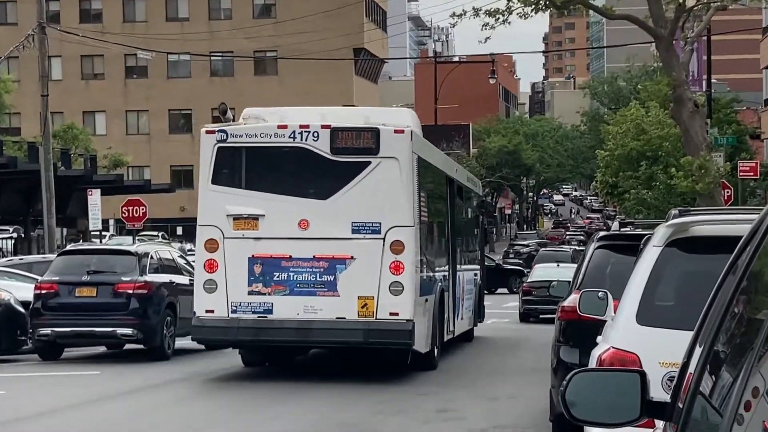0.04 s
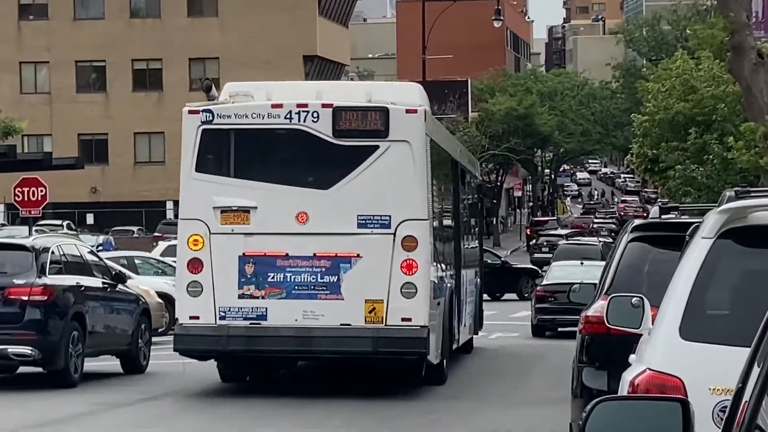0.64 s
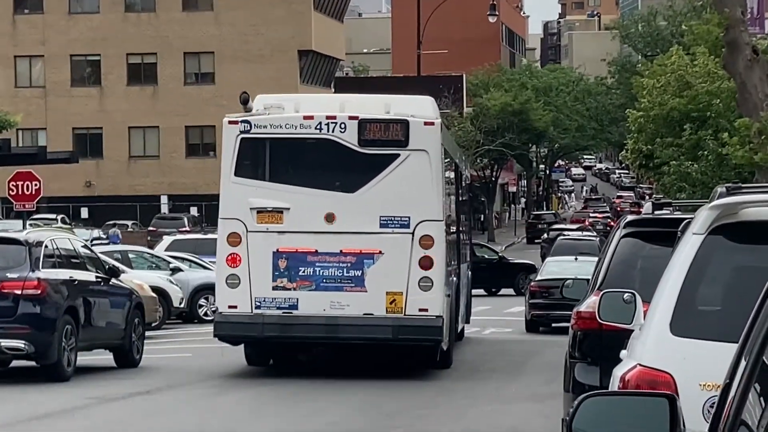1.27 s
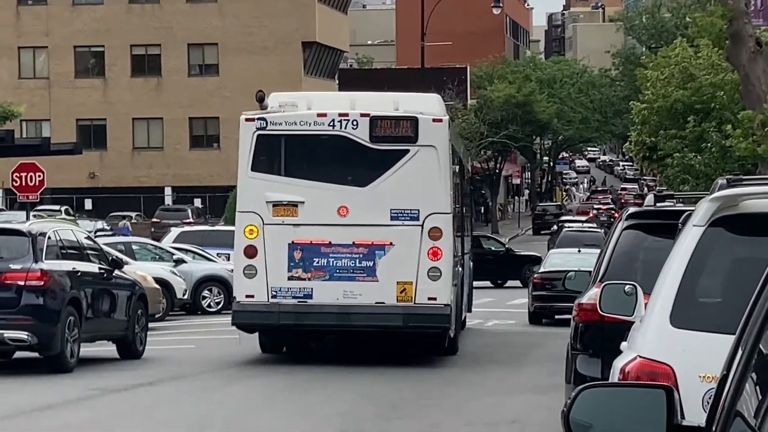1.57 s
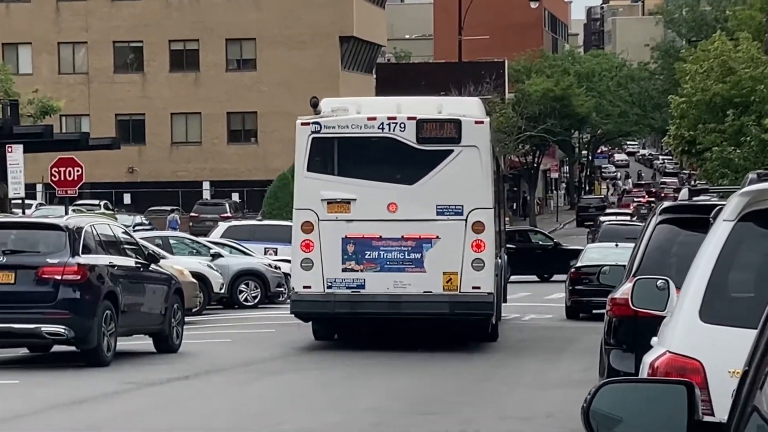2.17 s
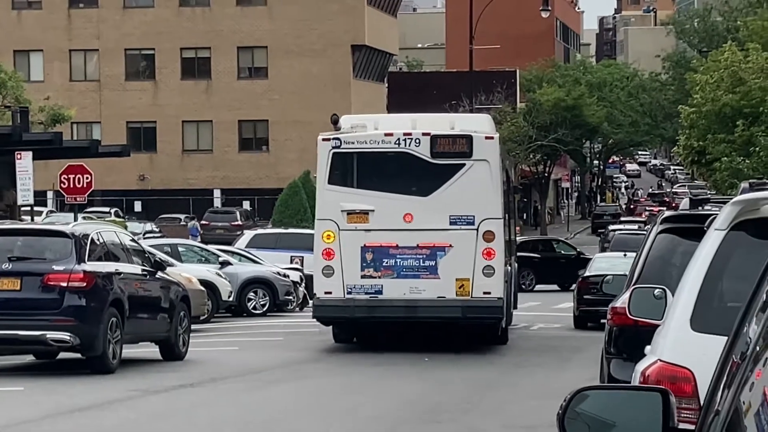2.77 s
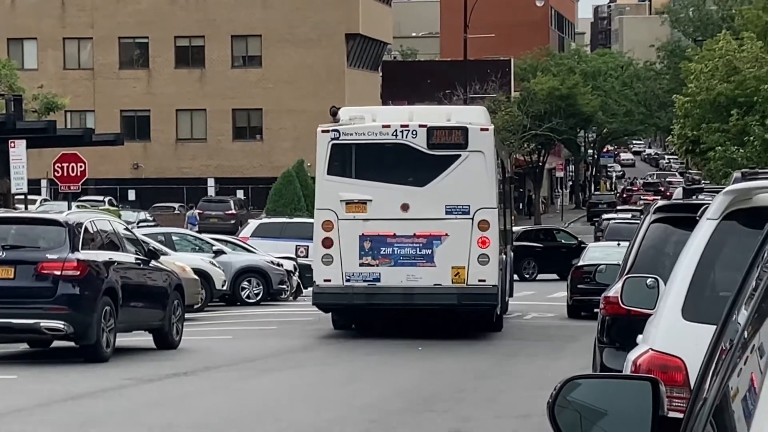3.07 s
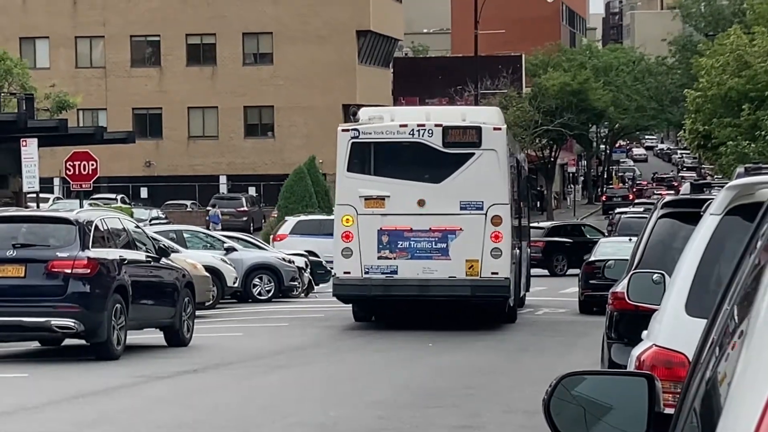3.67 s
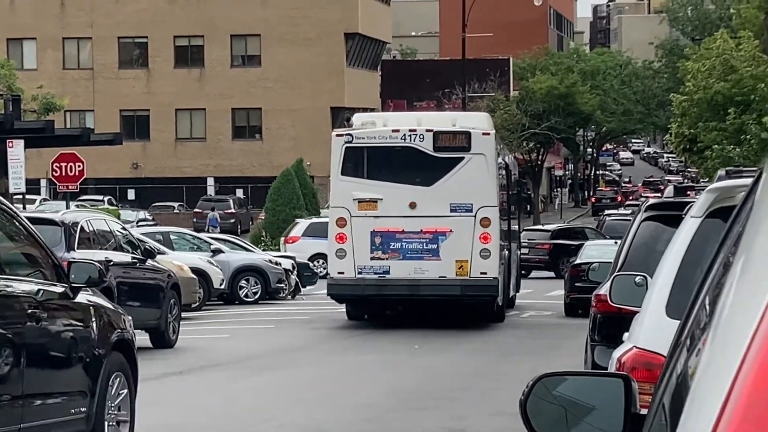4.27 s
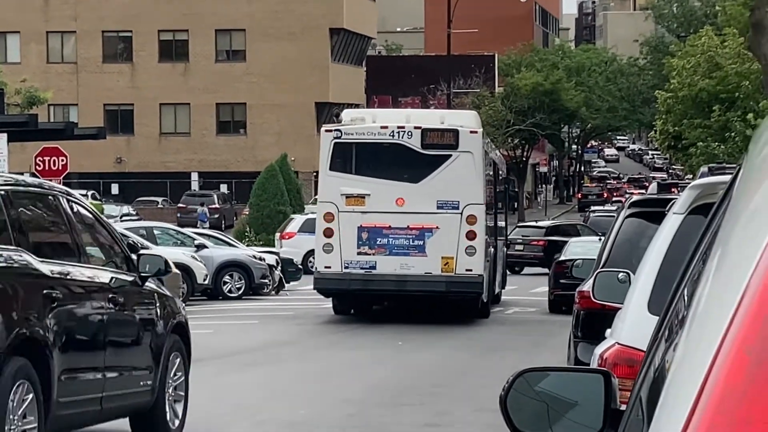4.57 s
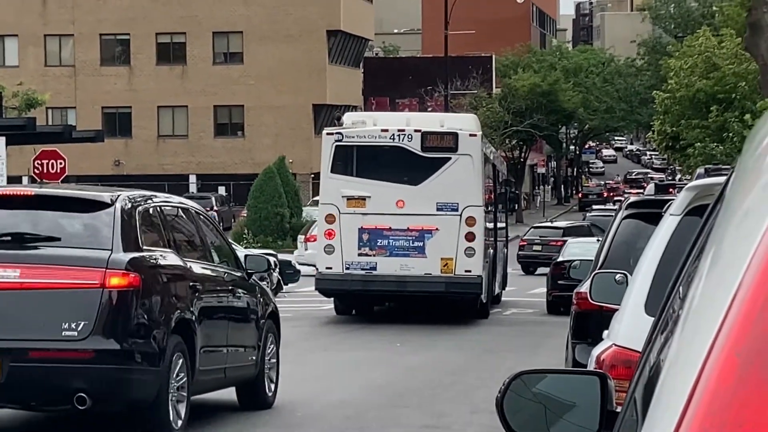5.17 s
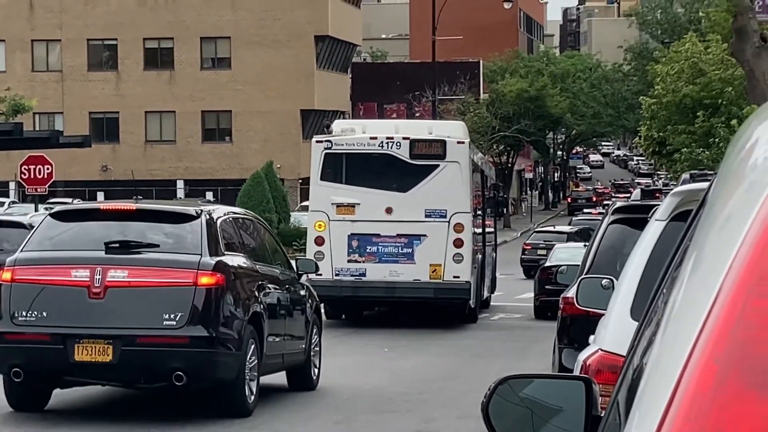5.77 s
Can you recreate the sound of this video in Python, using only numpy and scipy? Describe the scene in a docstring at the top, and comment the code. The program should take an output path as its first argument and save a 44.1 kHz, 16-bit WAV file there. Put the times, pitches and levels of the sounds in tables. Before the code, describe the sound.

On a busy street, a departing bus rumbles and slows, its brakes squeaking and air hissing out as a breeze picks up.

```python
"""A busy city street, kerb side of a traffic queue. A bus rolls away and eases off.
Its diesel drones at a steady firing rate; gear whines fall with the wheels; brake pads stick and slip,
singing and squeaking. Traffic booms and hisses, and the middle of the sound dips briefly after 4 s.
A breeze buffets the two microphone ports. A valve bleeds air, then puffs near the end."""
import sys
import numpy as np
from scipy import signal
from scipy.fft import rfft, irfft, next_fast_len
from scipy.io import wavfile
from scipy.ndimage import uniform_filter1d

SR = 44100
rng = np.random.default_rng(int(sys.argv[2]) if len(sys.argv) > 2 else 0)


def transcribe(signal):
    """Save signal, clipped to [-1, 1], as a 16-bit WAV file at the path in sys.argv[1]."""
    frames = np.atleast_2d(signal).T
    limited = np.clip(frames, -1, 1)
    pcm = np.round(limited * 32767).astype(np.int16)
    wavfile.write(sys.argv[1], SR, pcm)


N = 261507
TIME_S = np.arange(N) / SR
BINS_HZ = np.fft.rfftfreq(N, 1 / SR)
FIRING_HZ = 39.72
START_M_PER_S, START_DISTANCE_M = 6.5, 45

# Low engine-bay tones: exhaust partials plus a separate 137 Hz accessory hum.
# Each row: frequency as a ratio to the firing rate, relative dB at start, midway and end.
LOW_TONES = [(1, -8, -10, -6), (2, 0.5, 0, -1), (3, -20, -13, -12), (3.45, -6, -11, -13), (4, -6, -12, -26),
             (5, -14, -3, -28), (5.4, -16, -11, -24), (6, -12, -7.5, -18), (6.75, -13, -20, -22),
             (7, -19, -15, -18)]
# Drone of the low tones. Each row: time in seconds, base level in dB.
DRONE_DB = [(0, -35.5), (.8, -32.8), (1.7, -36), (2.4, -39), (2.9, -38), (3.6, -38.3), (4.4, -43),
            (5.3, -36)]
# Upper accessory hum. Each row: time in seconds, level in dB.
HUM_DB = [(0, -50), (1.2, -47), (2.05, -46), (3.15, -48), (3.7, -54), (4.5, -51), (5.1, -47.5),
          (5.93, -45.5)]
# Engine noise. Each row: time in seconds, growl in dB, clatter in dB.
GROWL_CLATTER_DB = [(0, -34, -40), (1, -36.5, -38.5), (1.8, -36, -40.5), (2.4, -37, -40), (3.3, -37.5, -43),
                    (3.8, -42.5, -43), (4.4, -39.5, -41.5), (5.3, -40, -41), (5.6, -38.5, -41),
                    (5.93, -39.5, -42.5)]
# Engine bay resonances. Each row: frequency in Hz, level in dB at the starting distance.
BAY_MODES = [(825, -46), (1370, -51)]
# Gear shaft, slowing with the wheels. Each row: time in seconds, turning rate in Hz.
SHAFT_HZ = [(0, 132.1), (2.2, 91.6), (3, 77.5), (4.2, 49)]
# Two gear meshes and sidebands of uneven teeth. Each row: multiple of the shaft rate, relative dB.
MESH_ORDERS = [(25, -12), (26, -10), (28, 0), (29, -9), (30, -6), (31, -3), (33, -9)]
# Whines under changing tooth load. Each row: time in seconds, base level in dB.
TOOTH_LOAD_DB = [(0, -69), (.3, -66), (.6, -68), (.9, -62), (1.05, -62), (1.2, -66), (1.49, -65),
                 (1.55, -55), (1.85, -60), (2, -56), (2.15, -59), (2.45, -55), (2.8, -56), (3.05, -58.5),
                 (3.35, -57), (3.7, -56), (3.95, -56), (4.3, -70), (5.93, -100)]
# Gear casing resonances. Each row: frequency in Hz, width in Hz, lift in dB.
CASING_MODES = [(4000, 250, 11), (3570, 160, 14.5), (2885, 90, 14), (2560, 60, 9), (2440, 50, 9),
                (2290, 90, 11), (2030, 200, 7), (1800, 130, 10.5)]
# Whine direction. Each row: frequency in Hz, share of the street's angle off the microphone axis.
WHINE_DIRECTION = [(1700, .8), (2000, 1), (2200, .66), (2600, .66), (2750, 1)]
# Tooth rasp, dragging brake pad, fan tone. Each row: time in seconds, level in dB.
TOOTH_RASP_DB = [(0, -70), (1.1, -62), (1.7, -54), (2.5, -52.5), (3.2, -52), (4, -58), (5.93, -90)]
PAD_DRAG_DB = [(0, -48.5), (.38, -59), (.62, -51), (.8, -57), (1.65, -50.5), (2.05, -49.5), (2.25, -57.5),
               (3.58, -56), (3.75, -62.5), (5.93, -72)]
FAN_DB = [(0, -41), (.4, -40.5), (.6, -44), (.82, -41.5), (1, -48), (1.15, -39), (1.65, -41), (2.1, -49),
          (2.35, -44), (3.15, -43.5), (3.55, -40), (4.05, -41), (4.2, -47), (4.35, -42.5), (4.5, -49),
          (4.7, -44.5), (5.25, -43.5), (5.5, -49), (5.75, -45), (5.93, -48)]
# Brake squeaks. Each row: start in seconds, length in seconds, pitch in Hz, glide in Hz, relative dB.
BRAKE_SQUEAKS = [(0.01, 0.15, 7060, -170, -64), (0.078, 0.1, 8170, 132, -55.5),
                 (0.19, 0.17, 7000, -190, -61), (0.21, 0.08, 8790, 40, -65), (0.429, 0.11, 8210, 103, -50),
                 (0.795, 0.1, 8280, 90, -57), (0.99, 0.07, 8670, 40, -69), (1.285, 0.078, 8340, 132, -63),
                 (1.613, 0.073, 8220, 87, -48.5), (1.861, 0.071, 8810, -17, -54),
                 (2.123, 0.18, 8330, 97, -54), (2.572, 0.1, 8330, -110, -52.5),
                 (3.224, 0.23, 8440, -91, -54.5), (3.779, 0.12, 8440, -22, -46.5),
                 (3.903, 0.13, 8410, -36.5, -46.5), (4.022, 0.07, 8420, 100, -57),
                 (4.107, 0.13, 8490, 47, -54.5), (5.125, .08, 10430, 10, -60),
                 (5.21, 0.15, 9150, 114, -59.5), (5.398, 0.08, 5450, -150, -61),
                 (5.475, 0.055, 9200, -40, -58)]
# Air bleed, then puff. Each row: fully open at seconds, hold in seconds, dB, rise and fall in dB/s.
VALVE_RELEASES = [(2.7, 0.84, -50.5, 47, 13), (5.52, 0.05, -46.5, 180, 80)]
# Wind gusts. Each row: peak time in seconds, level in dB.
GUST_PEAKS = [(2.518, -42), (2.88, -36), (3.278, -33), (4.72, -53)]
# Noise spectra. Each row: frequency in Hz, relative density in dB.
BOOM_SPECTRUM = [(15, -62), (30, 1.5), (42, 2), (66, 0), (90, -1), (115, -2.5), (150, -7), (200, -9),
                 (300, -8.5), (420, -7), (540, -19), (800, -14.5), (2000, -112)]  # engine bay and traffic
GROWL_SPECTRUM = [(200, -68), (500, -3), (700, 1.5), (850, 5), (950, 4), (1100, -3), (1500, -76),
                  (3000, -90)]
CLATTER_SPECTRUM = [(400, -59), (900, -31), (1200, 0), (1450, -2.5), (1800, -5.5), (2200, -12), (3000, -19),
                    (8000, -77)]
REAR_GROWL_SPECTRUM = [(200, -67), (480, -6.5), (680, -4), (820, 6), (930, 0.5), (1080, -11.5), (1500, -21),
                       (2000, -17), (2600, -60)]
TYRE_SPECTRUM = [(800, -47), (2200, 1), (3300, 2.5), (4000, 3.5), (5000, -1), (6500, -3.5), (7800, -7),
                 (10000, -7.5), (11500, -17.5), (14000, -17), (16000, -58)]
CAR_SPECTRUM = [(500, -36), (1500, -9), (2300, -12), (3000, 3), (3700, 8), (5000, -3.5), (7000, -12),
                (12000, -49)]
AIR_SPECTRUM = [(900, -20), (2000, 5), (3200, 6.5), (4500, 7), (6000, 3), (8000, 0), (10000, 4),
                (13000, -8), (16000, -10)]
WIND_SPECTRUM = [(20, -30), (32, -14), (48, 0), (90, -3), (160, -11), (350, -20), (900, -45), (3000, -100)]
# Microphone ports. Each row: frequency in Hz, left lead in radians, coherence, left minus right in dB.
PORT_RESPONSE = [(60, -.05, .93, 1.8), (250, -.25, .85, 3), (390, -.85, .7, 2.5), (550, -1.8, .42, 0),
                 (950, -2.4, .88, -1), (1300, -2.5, .6, -.5), (1900, -3.1, .55, 0), (4200, -3.3, .66, 0),
                 (5500, -3.1, .7, 0), (7100, -1.5, .7, 0), (8000, -.2, .9, 0), (8800, 0, .9, 0),
                 (11000, 2.5, .72, 0), (14500, 6.1, .6, 0)]


def diesel(hum_hz=398, muffler_hz=207):
    """Steady exhaust partials and a 137 Hz accessory hum, an upper hum, a muffler rung by gas flow."""
    drone_db = curves(DRONE_DB)[0]
    drone = np.zeros((2, N))
    for ratio, *tone_db in LOW_TONES:
        db = drone_db + np.interp(TIME_S, np.linspace(0, TIME_S[-1], len(tone_db)), tone_db)
        drone += tone(np.full(N, ratio * FIRING_HZ), db, scatter=.08 * ratio, flutter_hz=3.55)
    hum = tone(hum_hz * doppler(), curves(HUM_DB)[0], scatter=.84, flutter_hz=12)
    flow_db = swell(1.6, 3.12, db=-42, rise_db_per_s=7, fall_db_per_s=58)
    muffler = tone(np.full(N, muffler_hz), flow_db, scatter=3, flutter_hz=32.7)
    return drone + hum + muffler


def engine_noise(knock_depth=.036, boom_db=-32):
    """Boom, growl, clatter and bay resonances; combustion knock pulses the growl and clatter."""
    growl_db, clatter_db = curves(GROWL_CLATTER_DB)
    knock = 1 + knock_depth * np.cos(2 * np.pi * 2 * FIRING_HZ * TIME_S)
    # the boom grows while the drive holds the bus back
    labour_db = 3 * amp(swell(2.45, .34, db=-.5, rise_db_per_s=22, fall_db_per_s=22))
    boom = noise(BOOM_SPECTRUM) * amp(boom_db + labour_db + distance_db())
    growl = noise(GROWL_SPECTRUM) * amp(growl_db + 1.2 * drift(25))
    clatter = noise(CLATTER_SPECTRUM) * amp(clatter_db + .8 * drift(30))
    bay = sum(tone(np.full(N, hz), db + distance_db(), scatter=17, flutter_hz=43.2)
              for hz, db in BAY_MODES)
    return boom + mottle(knock * (growl + clatter) + bay, depth_db=2, patch_hz=90, patch_s=.07)


def gears(rasp_order=25):
    """Mesh whines and the rasp of rattling teeth fall with the shaft and fade; a whistle joins them."""
    shaft_hz = curves(SHAFT_HZ)[0] + .35 * drift(40)
    load_db = curves(TOOTH_LOAD_DB)[0]
    whines = np.zeros((2, N))
    for order, mesh_db in MESH_ORDERS:
        hz = order * shaft_hz
        db = load_db + mesh_db + casing_db(hz) + 2 * drift(14)
        whines += tone(hz, db, scatter=1.2, flutter_hz=55)
    rasp = tone(rasp_order * shaft_hz, curves(TOOTH_RASP_DB)[0], scatter=6, flutter_hz=560)
    echoed = street_echo(whines + rasp + whistle(), t60_s=.092, wet_db=-2.5)
    return ports(echoed, off_axis=spectra(WHINE_DIRECTION)[0])


def casing_db(hz):
    """Lift of a whine as it slides through the casing resonances."""
    power = sum(amp(db) ** 2 / (1 + (2 * (hz - mode_hz) / width_hz) ** 2)
                for mode_hz, width_hz, db in CASING_MODES)
    return 10 * np.log10(1 + power)


def brakes(pad_hz=7080, squeak_gain_db=6, taper_share=.85):
    """Pads stick and slip on the discs: a thin note and squeaks, steadier in pitch as the wheels slow."""
    drag_hz = pad_hz + 45 * pace() * drift(48)
    pad = tone(drag_hz, curves(PAD_DRAG_DB)[0], scatter=1.6, flutter_hz=70)
    waver_hz = 90 * pace() ** 2 * drift(160)
    squeaks = np.zeros(N)
    for start_s, length_s, hz, glide_hz, db in BRAKE_SQUEAKS:
        on = (TIME_S >= start_s) & (TIME_S < start_s + length_s)
        cycles = np.cumsum(hz + glide_hz * (TIME_S[on] - start_s) / length_s + waver_hz[on]) / SR
        envelope = np.sqrt(2) * amp(db + squeak_gain_db) * signal.windows.tukey(on.sum(), taper_share)
        squeaks[on] += envelope * np.sin(2 * np.pi * cycles)
    return street_echo(pad + squeaks, t60_s=.44, wet_db=-1)


def fan(blade_hz=652.5):
    """Blade tone of the cooling fan, from nearly straight ahead."""
    blades = tone(blade_hz * doppler(), curves(FAN_DB)[0], scatter=.45, flutter_hz=15)
    return ports(blades, off_axis=.6)


def rear_growl():
    """Growl thrown straight back from the bus, alike at both ports; builds, stops as the bus eases off."""
    db = swell(3.25, .827, db=-42, rise_db_per_s=30, fall_db_per_s=700)
    growl = noise(REAR_GROWL_SPECTRUM, coherence_scale=3)
    return mottle(growl, depth_db=2.5, patch_hz=80, patch_s=.08) * amp(db)


def whistle(start_hz=4850, rise_hz_per_s=440):
    """A faint whistle, climbing steadily."""
    db = swell(1.9, .4, db=-65, rise_db_per_s=8, fall_db_per_s=18)
    return tone(start_hz + rise_hz_per_s * TIME_S, db, scatter=4.1, flutter_hz=70)


def hisses():
    """Tyres on the street, a car drawing alongside, compressed air let out of the bus."""
    tyre_gain = amp(-47.5 + distance_db())
    tyre_gain += amp(swell(2, 1, db=-57.5, rise_db_per_s=33, fall_db_per_s=21))
    car_gain = amp(swell(5, .65, db=-50, rise_db_per_s=24, fall_db_per_s=2))
    air_gain = sum(amp(swell(*release)) for release in VALVE_RELEASES)
    layers = (TYRE_SPECTRUM, tyre_gain), (CAR_SPECTRUM, car_gain), (AIR_SPECTRUM, air_gain)
    hiss = sum(noise(spectrum) * gain * amp(.8 * drift(21.5)) for spectrum, gain in layers)
    return mottle(hiss, depth_db=1.6, patch_hz=350, patch_s=.06)


def breeze():
    """Light wind gets up; lumpy gusts rumble at each port with its own noise."""
    wind_gain = amp(swell(2.63, 3.3, db=-39.5, rise_db_per_s=45, fall_db_per_s=0))
    gust_gain = sum(amp(swell(peak_s, 0, db, rise_db_per_s=140, fall_db_per_s=106))
                    for peak_s, db in GUST_PEAKS)
    lumps_db = 2.5 * drift(12)
    return noise(WIND_SPECTRUM, coherence_scale=0) * (wind_gain + gust_gain) * amp(lumps_db)


def pace():
    """Road speed as a share of the starting speed."""
    return curves(SHAFT_HZ)[0] / SHAFT_HZ[0][1]


def distance_db():
    """Spreading loss of the receding bus, 0 dB at the start."""
    travelled_m = START_M_PER_S * np.cumsum(pace()) / SR
    return -20 * np.log10(1 + travelled_m / START_DISTANCE_M)


def doppler():
    """Pitch factor of the receding bus."""
    return 1 - START_M_PER_S * pace() / 343


def street_echo(x, t60_s, wet_db, taps_per_s=2000):
    """Adds sparse reflections off house fronts and parked cars."""
    delay_s = np.arange(SR // 2) / SR
    taps = rng.standard_normal((2, len(delay_s))) * (rng.random(len(delay_s)) < taps_per_s / SR)
    taps += 2 * taps.mean(0)  # partly common to both channels
    taps = taps * amp(-60 * delay_s / t60_s) * (delay_s > .004)
    return x + amp(wet_db) * signal.fftconvolve(x, taps / np.linalg.norm(taps[0]), axes=1)[:, :N]


def mottle(x, depth_db, patch_hz, patch_s):
    """Shifting sound paths lift and sink small patches of the spectrum."""
    frames = signal.stft(x, nperseg=1024, noverlap=768)[2]
    field = rng.standard_normal(frames.shape[1:])
    for axis, steps in enumerate((patch_hz * 1024 / SR, patch_s * SR / 256)):
        for _ in range(2):
            field = uniform_filter1d(field, max(round(steps), 1), axis)
    gain = unit(amp(depth_db * unit(field)))
    return signal.istft(frames * gain, nperseg=1024, noverlap=768)[1][:, :N]


def brief_dip(x, depth=1 - 10 ** (-13 / 20)):
    """The middle drops away for a moment, leaving the sound hollow and wide."""
    dip = curves([(4.075, 0), (4.088, .9), (4.19, 1), (4.28, .12), (4.4, 0)])[0]
    band_db = spectra([(60, -14), (160, -10), (380, -2.5), (650, -.5),
                       (900, -2.5), (1400, -5), (2500, -9), (6000, -41)])[0]
    centre = irfft(rfft(x.mean(0)) * amp(band_db), N)
    return x - depth * dip * centre


def ports(x, off_axis=1):
    """Phase and level difference between the microphone ports; less phase nearer the axis."""
    lead_rad, _, balance_db = spectra(PORT_RESPONSE)
    left = np.exp(.5j * lead_rad * off_axis) * amp(balance_db / 2)
    return irfft(rfft(x) * np.array([left, 1 / left]), N)


def tone(hz, db, scatter, flutter_hz):
    """A sine plus its copies off moving surfaces; flutters differently at each port."""
    echoes = np.array([drift(flutter_hz) + 1j * drift(flutter_hz) for _ in range(3)])
    paths = unit(1 + scatter * unit(echoes[:2] + 2.2 * echoes[2]))
    return np.sqrt(2) * amp(db) * (paths * np.exp(2j * np.pi * np.cumsum(hz) / SR)).real


def noise(spectrum, coherence_scale=1):
    """Shaped stereo noise of rms 1, partly shared by both ports."""
    left, independent = rfft(rng.standard_normal((2, N)))
    coherence = np.clip(spectra(PORT_RESPONSE)[1] * coherence_scale, 0, 1)
    right = coherence * left + np.sqrt(1 - coherence ** 2) * independent
    return unit(irfft(np.array([left, right]) * amp(spectra(spectrum)[0]), N))


def drift(rate_hz):
    """Random wander of rms 1, up to about rate_hz."""
    size = next_fast_len(N, real=True)
    lowpass = np.exp(-(np.fft.rfftfreq(size, 1 / SR) / rate_hz) ** 2)
    return unit(irfft(rfft(rng.standard_normal(size)) * lowpass, size)[:N])


def swell(full_s, hold_s, db, rise_db_per_s, fall_db_per_s):
    """Level in dB: rises until full_s, holds, falls."""
    before_s = np.maximum(full_s - TIME_S, 0)
    after_s = np.maximum(TIME_S - full_s - hold_s, 0)
    return db - rise_db_per_s * before_s - fall_db_per_s * after_s


def curves(rows):
    """Columns of a time table, per sample."""
    times_s, *columns = np.transpose(rows)
    return [np.interp(TIME_S, times_s, column) for column in columns]


def spectra(rows):
    """Columns of a frequency table, per bin, interpolated on a log axis."""
    hz, *columns = np.transpose(rows)
    return [np.interp(np.log(BINS_HZ + 1), np.log(hz + 1), column) for column in columns]


def amp(db):
    """Decibels to gain."""
    return 10 ** (np.asarray(db) / 20)


def unit(x):
    """Scales to rms 1."""
    return x / np.sqrt(np.mean(abs(x) ** 2) + 1e-20)


def scene():
    """Bus, street and wind at the two ports."""
    fade = signal.windows.tukey(N, .003)
    street = ports(fade * (diesel() + engine_noise() + brakes() + hisses()))
    street += fade * (fan() + gears())
    return brief_dip(street) + rear_growl() + fade * breeze()


def record(dry):
    """Rumble filter at 35 Hz, band limit at 15.6 kHz."""
    highpass = signal.butter(9, 35, "highpass", fs=SR, output="sos")
    lowpass = signal.firwin(511, 15600, window=("kaiser", 9), fs=SR)
    return signal.oaconvolve(signal.sosfilt(highpass, dry), lowpass[None], "same", axes=1)


dry = scene()
out = record(dry)
transcribe(out)
```